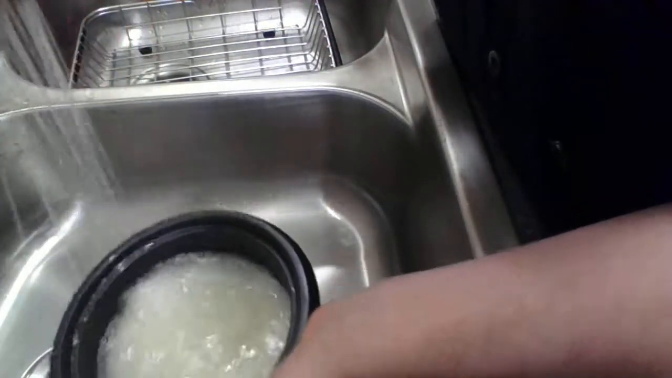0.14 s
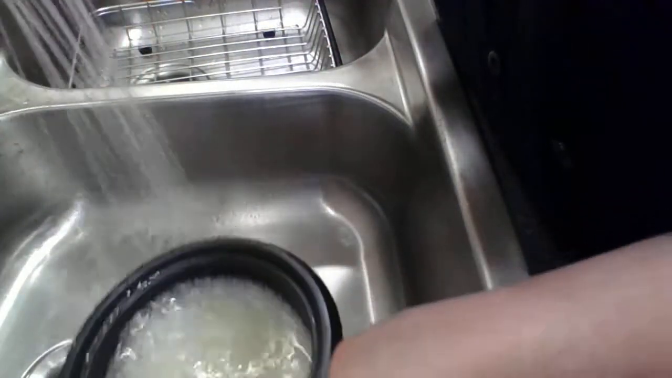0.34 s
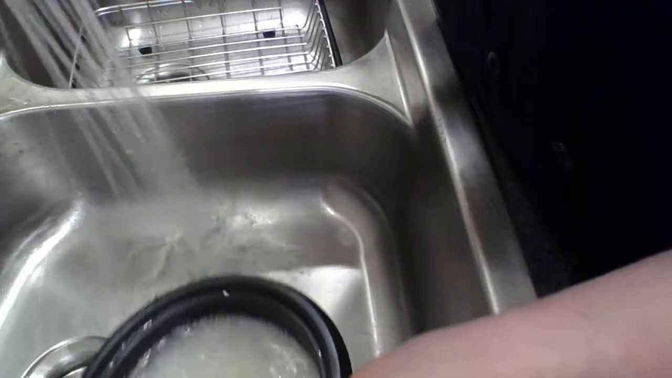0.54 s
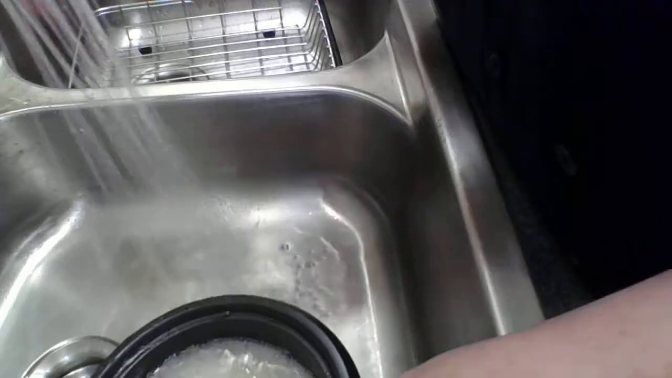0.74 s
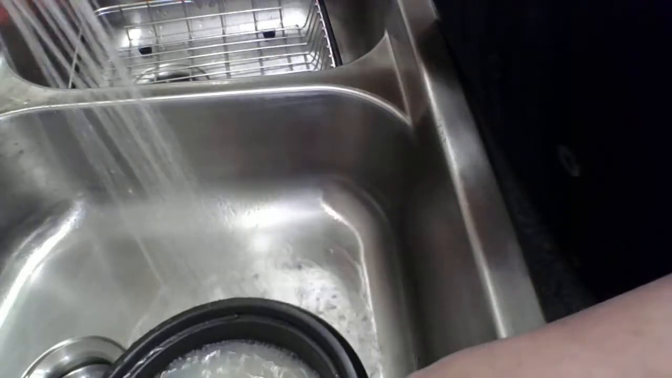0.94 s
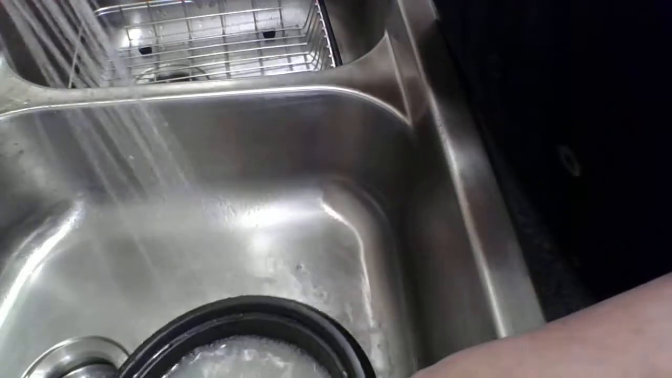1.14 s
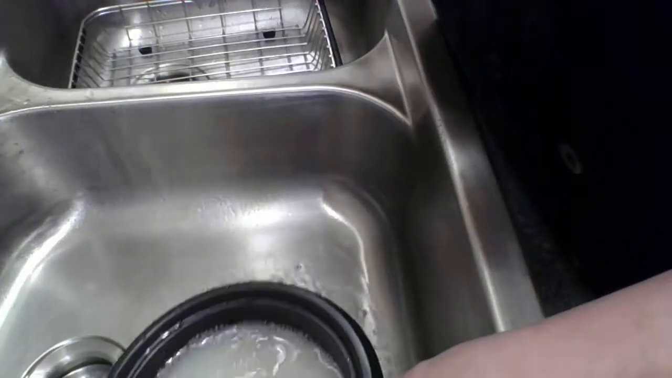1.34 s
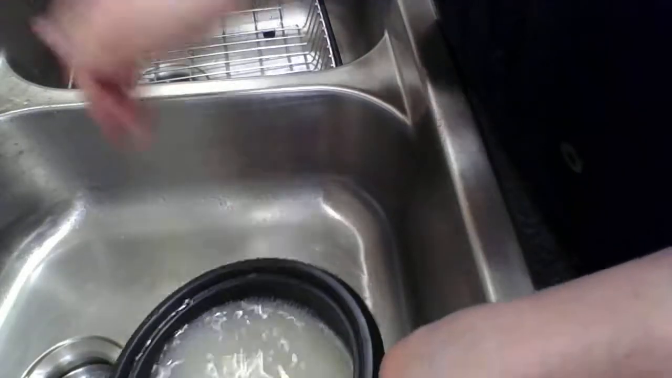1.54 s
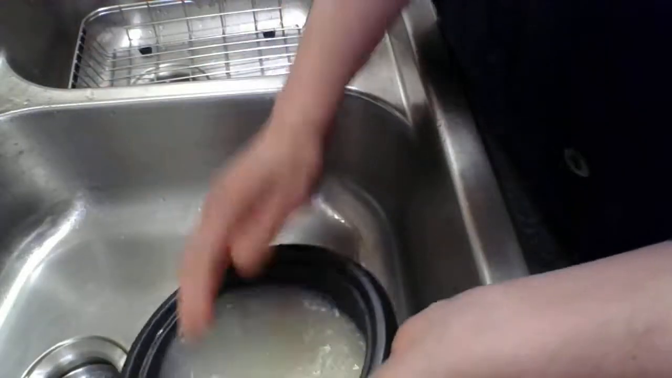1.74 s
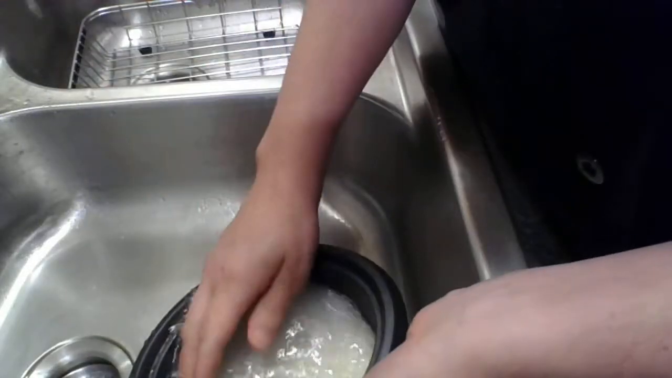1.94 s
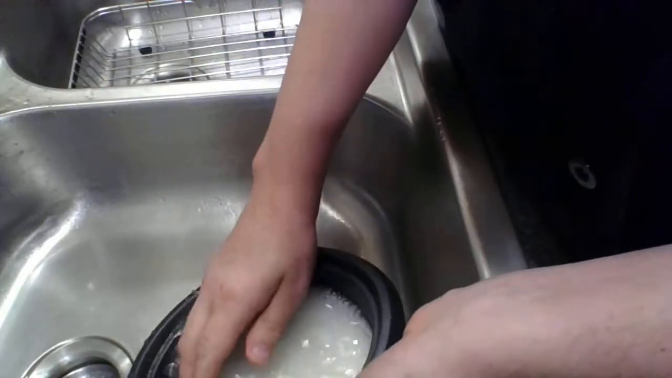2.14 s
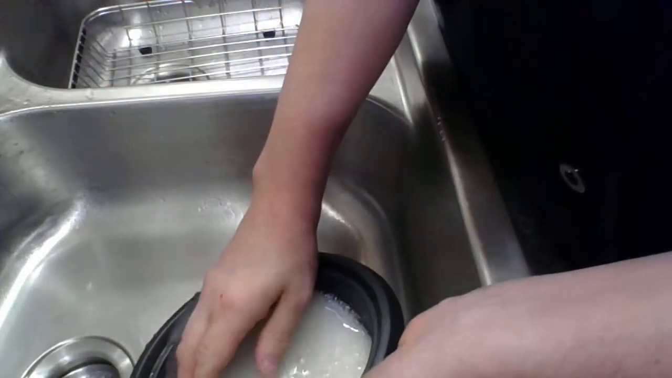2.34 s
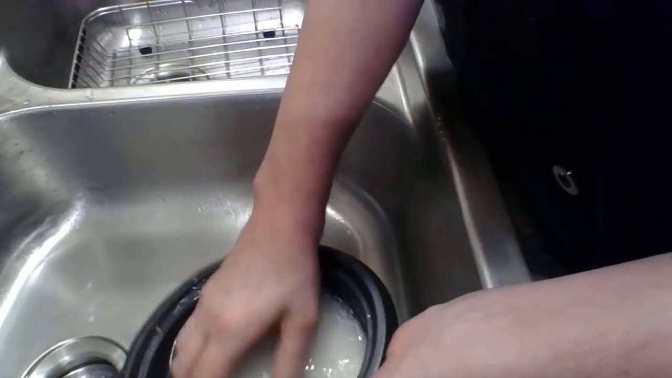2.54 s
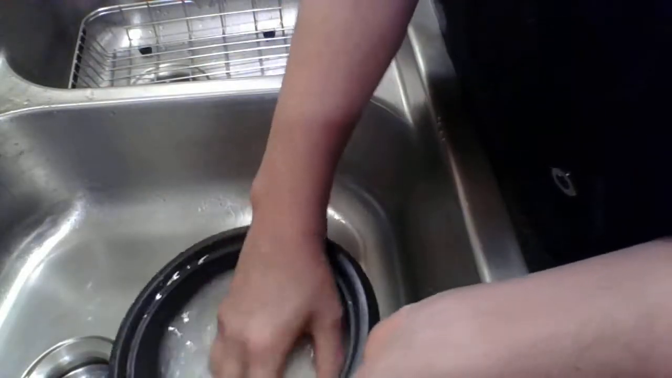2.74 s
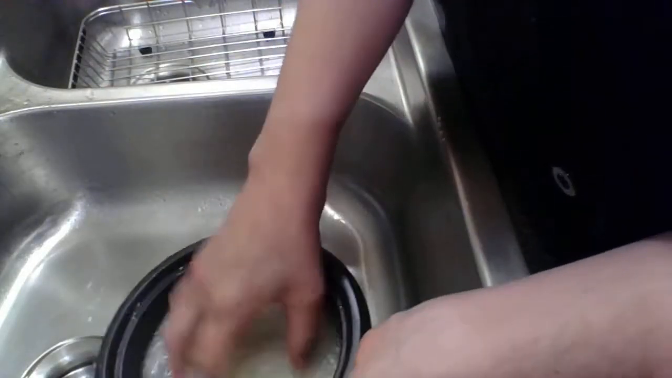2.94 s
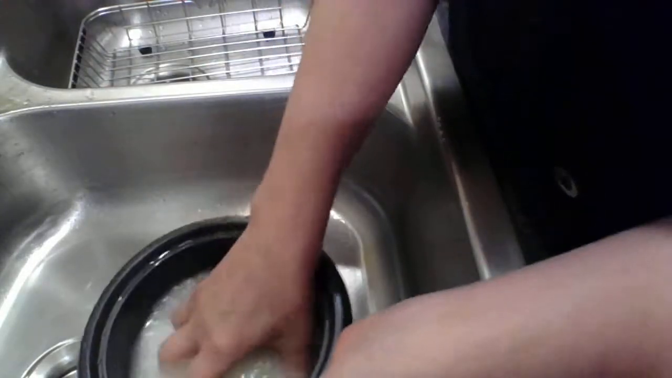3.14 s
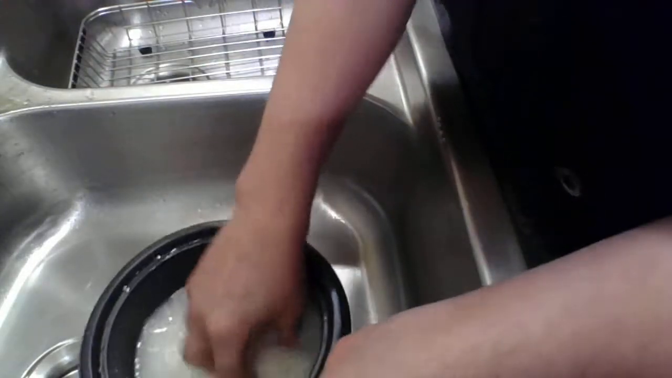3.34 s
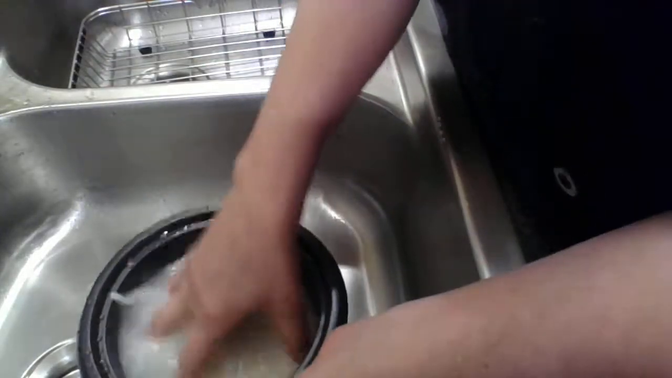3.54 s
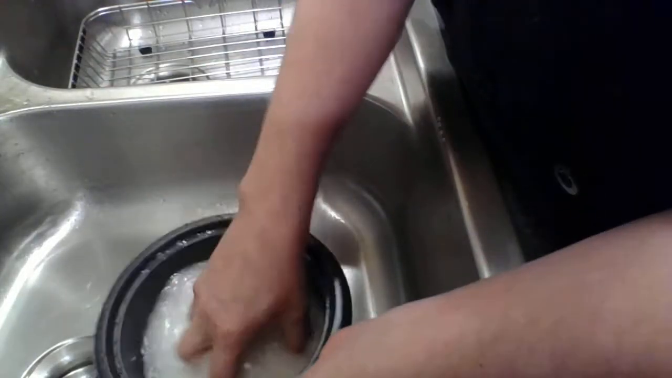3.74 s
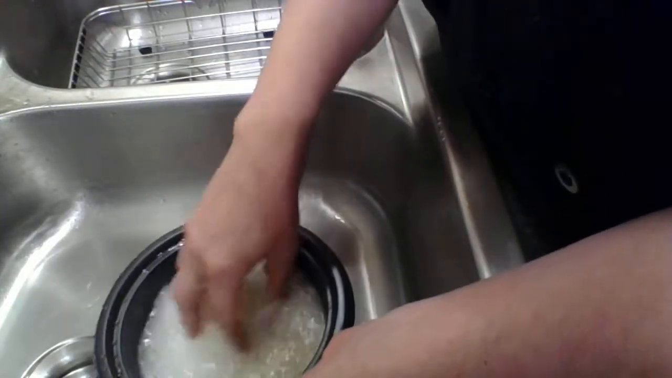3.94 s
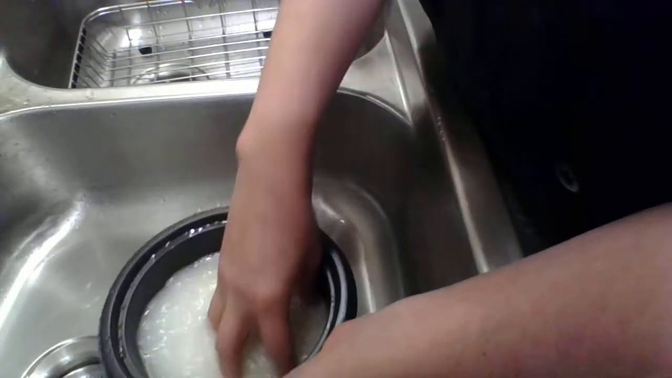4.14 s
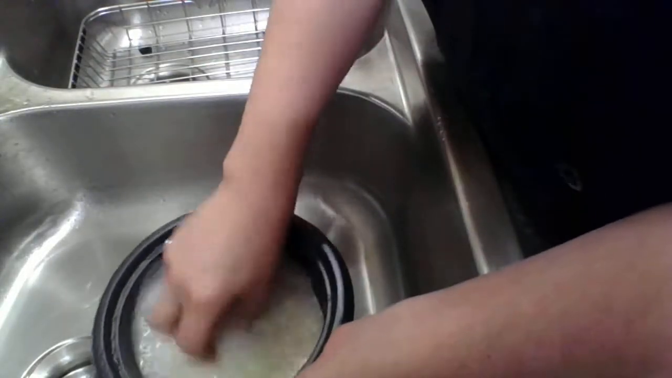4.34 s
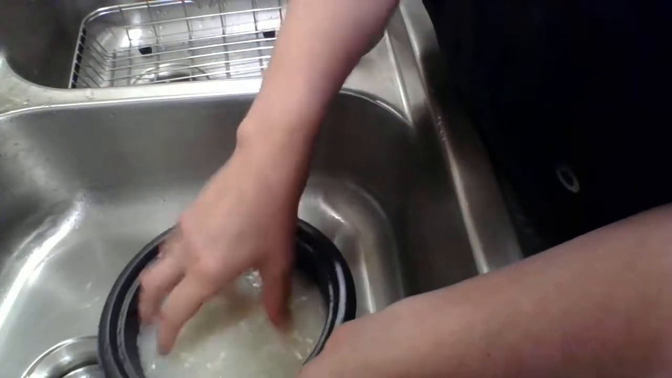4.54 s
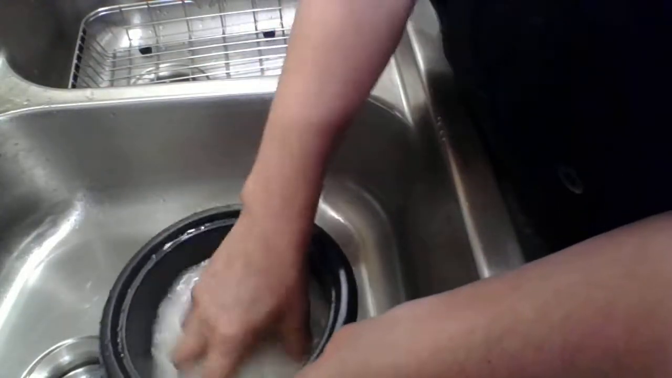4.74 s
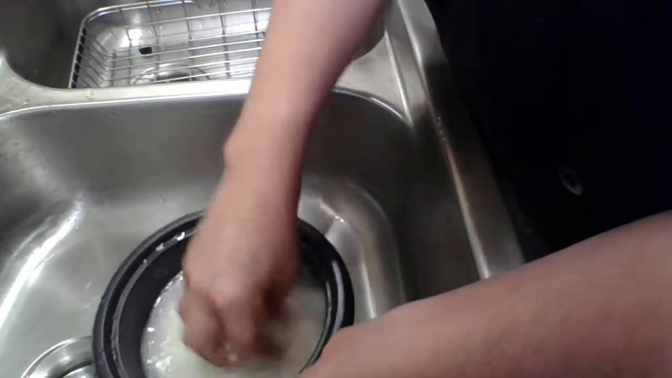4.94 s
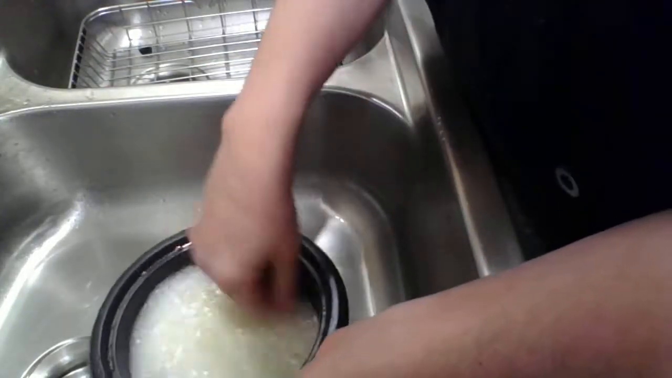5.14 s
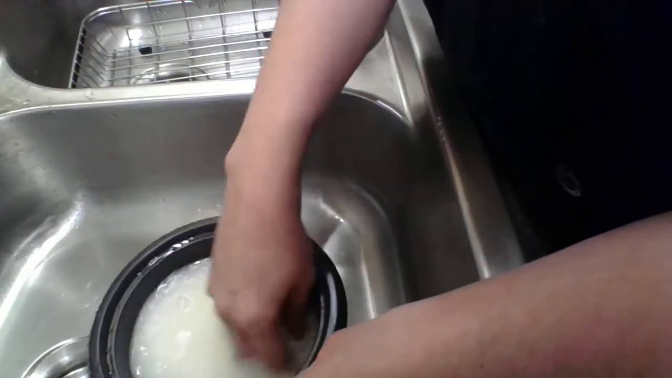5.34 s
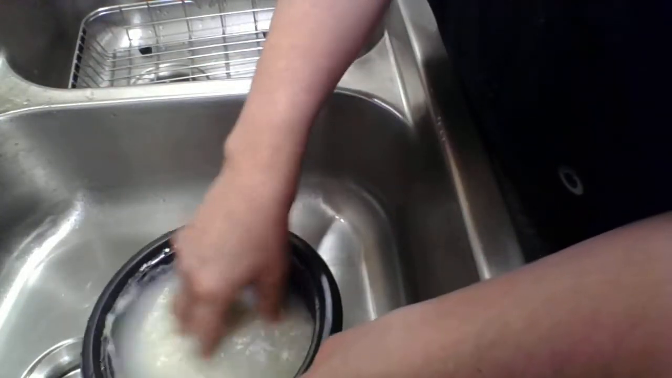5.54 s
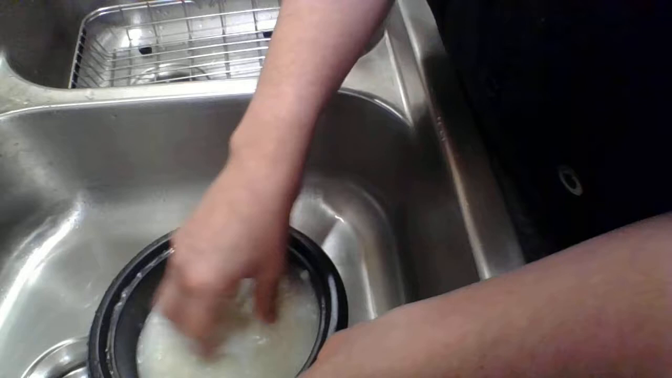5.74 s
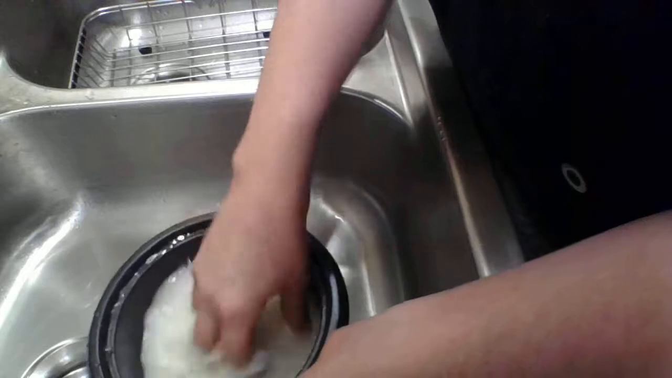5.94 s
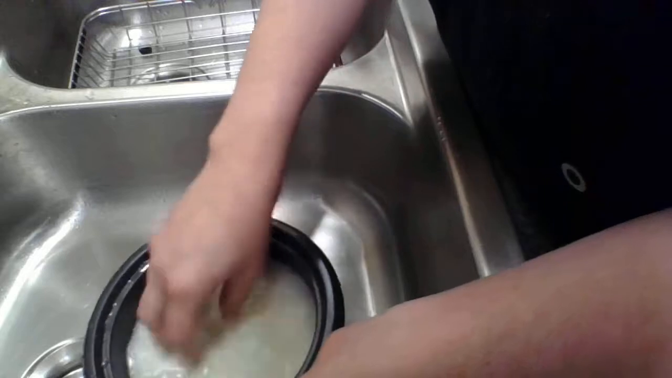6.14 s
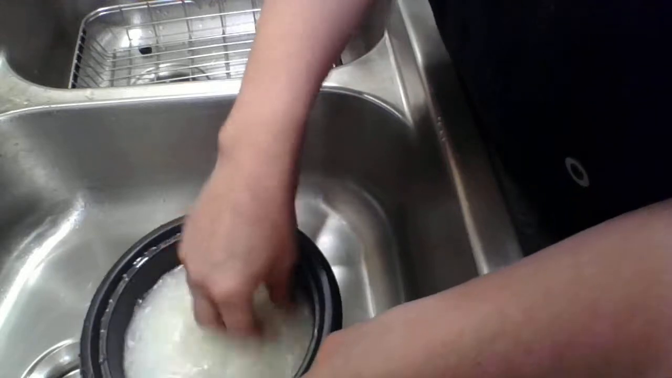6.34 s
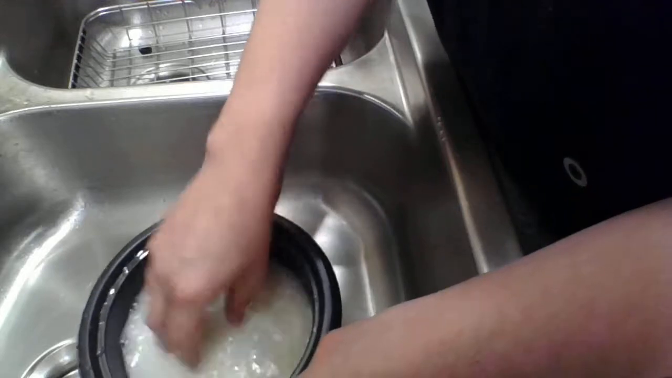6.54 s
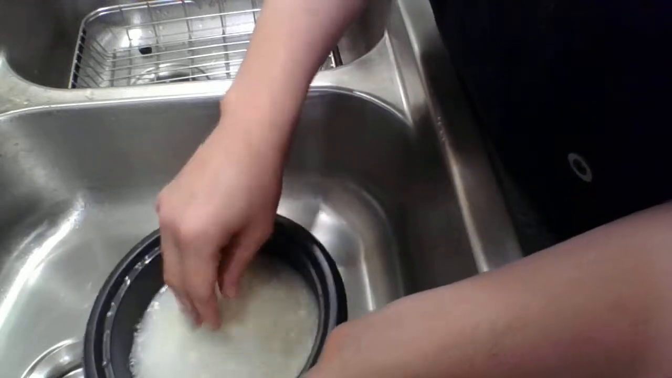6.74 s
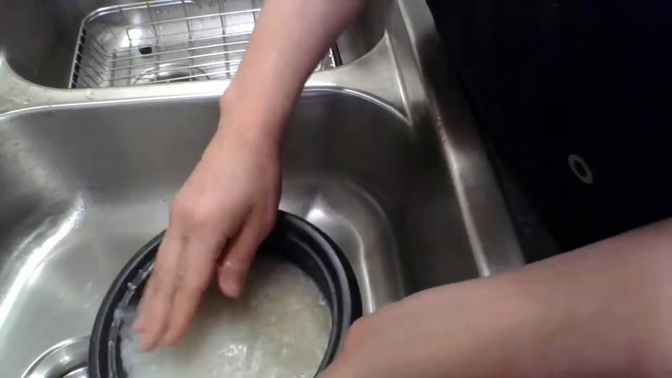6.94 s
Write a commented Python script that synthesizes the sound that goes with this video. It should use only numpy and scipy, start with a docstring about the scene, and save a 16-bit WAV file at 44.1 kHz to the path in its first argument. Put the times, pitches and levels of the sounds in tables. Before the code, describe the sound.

Water sprays into a metal kitchen sink, then shuts off, and rice is stirred by hand in a pot, sloshing, rustling and bumping.

```python
"""First a spray tap hisses and drums on a steel kitchen sink. After about 1.4 seconds it is shut off.
Then a hand stirs rice in a pot of water held in the basin: water sloshes, grains rustle, air pockets
ring and burst, and the pot bumps the sink floor. Midway the pot groans as it shifts on the wet steel.
Near the end come the loudest gurgles. The ringing basin colours the drumming, splashes and bumps."""
import sys
import numpy as np
from scipy import signal
from scipy.fft import rfft, irfft, next_fast_len
from scipy.io import wavfile
from scipy.ndimage import uniform_filter1d, map_coordinates

SR = 44100
rng = np.random.default_rng(int(sys.argv[2]) if len(sys.argv) > 2 else 0)


def log_audio(samples):
    """Write samples as a 16-bit WAV file to the path given in sys.argv[1]."""
    # one column per channel
    frames = np.atleast_2d(samples).T
    # limit to full scale, then quantise
    limited = np.clip(frames, -1, 1)
    pcm = np.round(limited * 32767).astype(np.int16)
    wavfile.write(sys.argv[1], SR, pcm)


N = 307818  # about 7 seconds


def amp(db):
    """Turn decibels (dB) into a gain to multiply by."""
    return 10 ** (np.asarray(db) / 20)


def unit(x):
    """Scale a sound to an average power of 1."""
    return x / np.sqrt(np.mean(x ** 2) + 1e-20)


def along(points, hz):
    """Read between (Hz, value) points, spaced by octaves."""
    f, v = np.transpose(points)
    return np.interp(np.log(hz + 1), np.log(f + 1), v)


def curves(rows):
    """One gain curve for each dB column; silent outside the table's times."""
    s, *cols = np.transpose(rows)
    return [amp(np.interp(np.arange(N) / SR, s, c, left=-150, right=-150)) for c in cols]


def wobble(rate):
    """A smooth curve through `rate` random values a second."""
    return map_coordinates(rng.standard_normal(int(N * rate / SR) + 4), [np.arange(N) * rate / SR])


def filtered(x, response):
    """Multiply each frequency f in a sound by response(f)."""
    size = next_fast_len(N + SR // 2)
    return irfft(rfft(x, size) * response(np.fft.rfftfreq(size, 1 / SR)), size)[..., :N]


def patchy(x, depth_db):
    """Turn narrow bands of a sound up and down briefly, at random."""
    bands = signal.stft(x, nperseg=1024)[2]
    patches = uniform_filter1d(rng.standard_normal(bands.shape), size=2, axis=0)
    patches = uniform_filter1d(patches, size=5, axis=1)
    return signal.istft(bands * amp(depth_db * unit(patches)), nperseg=1024)[1][:N]


def patter(rate, spread_db, smooth):
    """About `rate` random taps a second, over a `smooth` share of steady noise."""
    chance, size, side = rng.random((3, N))
    hits = (chance < rate / SR) * amp(-spread_db * np.log(size + 0.035)) * np.sign(side - .5)
    return unit(unit(hits) + smooth * rng.standard_normal(N))


def fizz(spectrum, count, cycles, spread_db, smooth):
    """Tiny fading pings of rising pitch over noise, coloured by the spectrum."""
    pitch, size, start = np.hsplit(rng.random((count, 3)), 3)
    hz = 900 * 13 ** pitch
    t = np.arange(int(40 * cycles + 120)) / SR
    age = hz * t / cycles
    pings = np.sin(2 * np.pi * hz * t * (1 + 0.0065 * age)) * np.exp(-age) * (1 - np.exp(-8 * age))
    pings *= np.sqrt(hz) * amp(-spread_db * np.log(size + 0.0035))
    where = (start * N).astype(int) + np.arange(len(t))
    sound = unit(np.bincount(where.ravel(), pings.ravel(), N + len(t))[:N])
    sound += smooth * rng.standard_normal(N)
    power = uniform_filter1d(np.abs(rfft(sound)) ** 2, size=4000)
    flat = irfft(rfft(sound) / np.sqrt(power + 1e-9), N)  # even it out before colouring
    return unit(filtered(flat, lambda f: amp(along(spectrum, f))))


def resonance(f, hz, width):
    """One ringing note: it answers most to frequencies near hz."""
    return 1j * f * width / (hz * hz - f * f + 1j * f * width)


# Notes of the steel basin and the air in it. Each row: pitch in Hz, width in Hz, level in dB.
BASIN_NOTES = [(103.2, 13.5, -4), (170.5, 10.4, 6.5), (241.5, 37, -2.5), (328.4, 15.5, -1), (388.3, 22, 0),
               (502, 25.2, 1), (713.5, 25, -6.5), (784, 16, -7.5), (866, 22, -5.5), (968, 54, -9.5),
               (1108, 61, -9.5), (1283, 98, -20), (1487, 70, -22.5), (1587, 97, -25.5), (1604, 79, -20),
               (1766, 62, -27), (1810, 9.2, -20.5), (2180, 28, -24), (2440, 15, -29), (2610, 9.8, -24.5)]
def vessel(f, notes=BASIN_NOTES):
    """How a hollow vessel rings: the basin, unless other notes are given."""
    return sum((-1) ** k * amp(db) * resonance(f, hz, width) for k, (hz, width, db) in enumerate(notes))


# Tone of the background. Each row: frequency in Hz, level in dB.
AIR_TONE = [(24, -31), (58, -13.5), (95, 4.5), (186, 1.5), (310, -8), (441, -2.5), (631, -6), (863, -3),
            (972, -14), (1100, 2.5), (1360, -13.5), (2150, -17.5), (3080, -11), (4630, -8), (8030, -18.5),
            (10700, -8), (12400, -37.5), (16100, -65), (22000, -120)]
def air():
    """The steady murmur of the room and the microphone."""
    return amp(-78.5) * unit(filtered(rng.standard_normal(N), lambda f: amp(along(AIR_TONE, f))))


# The room's echo. Each row: frequency in Hz, seconds to fade by 60 dB.
ECHO_TIMES = [(200, 0.37), (1000, 0.18), (3000, 0.35), (10000, 0.033)]
def kitchen_echo(x):
    """The room answers; each frequency dies away at its own speed."""
    hz, t, bands = signal.stft(rng.standard_normal(SR // 2), SR, nperseg=256)
    tail = signal.istft(bands * amp(-60 * t / along(ECHO_TIMES, hz)[:, None]), SR, nperseg=256)[1]
    return signal.fftconvolve(np.pad(x, (300, 0)), tail / np.linalg.norm(tail))[:N]


# One list for each groan of the pot. Each row: time in seconds, pitch in Hz, level in dB.
GROANS = [
    [(2.74, 239, -82), (2.77, 265, -64), (2.795, 318, -69), (2.82, 364, -74), (2.86, 380, -86)],
    [(3.7, 876, -78), (3.718, 820, -64), (3.76, 826, -61.5), (3.8, 798, -68), (3.83, 754, -76)],
    [(3.55, 342, -78), (3.57, 341, -59), (3.63, 352, -69), (3.69, 361, -66.5), (3.8, 358, -67),
     (3.9, 344, -76.5), (4.2, 327, -79), (4.3, 342, -80)],
]
def groans():
    """The pot sticks and slips on the wet steel, making a rough, unsteady tone."""
    out, t = np.zeros(N), np.arange(N) / SR
    for rows in GROANS:
        s, hz, db = np.transpose(rows)
        phase = 2 * np.pi * np.cumsum(np.interp(t, s, hz)) / SR
        level = amp(np.interp(t, s, db, left=-150, right=-150) + 0.88 * wobble(25))
        out += level * ((0.07 + wobble(120)) * np.sin(phase) + wobble(120) * np.cos(phase))
    return out


# Finger strokes. Each row: time of the peak in seconds, peak level in dB, length in seconds.
STROKES = [(2.787, -70, 0.16), (3.137, -69, 0.29), (3.412, -72, 0.65), (3.647, -70, 0.081),
           (3.753, -59, 0.03), (3.827, -69, 0.18), (4.254, -67, 0.47), (4.555, -61.5, 0.057),
           (4.653, -59, 0.062), (4.806, -66, 0.22), (5.163, -67.5, 0.15), (5.298, -60, 0.078),
           (5.457, -58.5, 0.097), (5.6, -69.5, 0.41), (5.756, -65, 0.12), (5.882, -59, 0.04),
           (6.003, -64, 0.18), (6.126, -64, 0.039), (6.31, -64, 0.078), (6.4, -66.5, 0.18),
           (6.657, -61, 0.13), (6.897, -67.5, 0.027)]
# Tone of the rice. Each row: frequency in Hz, level in dB.
RICE_TONE = [(880, -36), (1500, -8.5), (1940, -1.5), (2550, 0), (3010, -10), (4440, -6.5), (5210, -13),
             (7890, -22.5), (8920, -20.5), (10700, -15.5), (11300, -20), (12400, -74.5), (16100, -78),
             (22000, -120)]
def rice(lumps):
    """Grains rub and tick against each other; each stroke swells, then fades more slowly."""
    swell_db, fade_db = 26, 12  # drop from the peak, one length before and after it
    rub = amp(0.97 * lumps + 1.7 * wobble(60))
    rub *= fizz(RICE_TONE, count=8000, cycles=3.2, spread_db=2.5, smooth=1.6)
    ticks = patter(700, spread_db=3.5, smooth=0.1)
    ticks = filtered(ticks, lambda f: amp(along(RICE_TONE, f)) * f / 4000)
    t = np.arange(N) / SR
    power = amp(-86.5) ** 2 * (t > STIR_LEVELS[0][0])  # a faint rustle once stirring starts
    for s, db, length in STROKES:
        power += amp(db - np.where(t < s, swell_db, fade_db) * np.abs(t - s) / length) ** 2
    return np.sqrt(power) * (unit(rub) + amp(-9.5) * unit(ticks))


# The stirring hand. Each row: time in seconds, slosh level in dB, rumble level in dB.
STIR_LEVELS = [(1.4, -55, -77), (1.5, -65.5, -94), (1.6, -64, -74), (1.68, -63, -66.5), (1.77, -72, -73.5),
               (2.05, -69.5, -75), (2.24, -63.5, -73.5), (2.52, -63.5, -67), (2.7, -55, -66),
               (2.84, -65, -74), (2.95, -64, -79), (3.02, -64, -77), (3.07, -62, -87), (3.13, -63, -77),
               (3.22, -61, -73), (3.3, -58, -64.5), (3.37, -57.5, -61.5), (3.47, -66.5, -79),
               (3.73, -61.5, -87), (3.95, -69, -80.5), (4.08, -76.5, -83), (4.3, -65.5, -85),
               (4.5, -74, -89), (4.67, -66, -84), (5.0, -83.5, -83.5), (5.17, -66.5, -79),
               (5.38, -73.5, -85.5), (5.55, -67.5, -74), (5.84, -67.5, -85), (5.95, -72.5, -73),
               (6.05, -51.5, -76), (6.27, -70, -80.5), (6.44, -55.5, -66), (6.59, -71, -75.5),
               (6.98, -75, -77.5)]
# Tones of the slosh and of its small bubbles. Each row: frequency in Hz, level in dB.
SLOSH_TONE = [(500, -25), (750, -8.5), (1200, -5), (2000, 6.5), (3000, 7.5), (4000, -16.5)]
PLIP_TONE = [(700, -37), (1000, 7.5), (1900, 5), (2600, -11), (3300, -21), (4500, -7), (6500, -40.5)]
def stirring():
    """Water sloshes in lumps, sheds small bubbles, moves the rice and rumbles through the pot."""
    slosh_gain, rumble_gain = curves(STIR_LEVELS)
    lumps = wobble(16)  # water and rice surge together
    water = patter(1500, spread_db=-6.5, smooth=0.95) * amp(0.85 * lumps + 3.66 * wobble(45))
    water = filtered(water, lambda f: (vessel(f) + amp(-41)) * amp(along(SLOSH_TONE, f)))
    plips = fizz(PLIP_TONE, count=3500, cycles=10, spread_db=4, smooth=0.1)
    rustle = rice(lumps)
    knocks = patter(67, spread_db=4.5, smooth=0.52)
    rumble = filtered(knocks, lambda f: vessel(f) / (1 + 1j * f / 330) ** 2)
    return slosh_gain * (amp(-4) * unit(water) + amp(-12.5) * plips) + rustle + rumble_gain * unit(rumble)


# Drops from the jets, then the fingers. Each row: start in seconds, level in dB, boosted pitch in Hz.
SPATTERS = [(.378, -50, 10000), (.449, -55, 10000), (.497, -53.5, 4000), (.555, -49.5, 5500),
            (.688, -49, 10500), (.698, -52, 5540), (.836, -44, 9600), (0.842, -44.5, 4770),
            (.925, -47.5, 9600), (.984, -65, 5000), (1.34, -67, 6500), (1.6378, -62, 3930),
            (3.029, -63, 4330), (3.5255, -58, 3820), (3.7493, -55, 4800), (3.7488, -55, 6700),
            (3.757, -54, 2970), (4.399, -56, 3480), (4.543, -57, 4000), (4.549, -64, 4500),
            (4.586, -50.5, 4100), (4.66, -60, 3900), (4.857, -50.5, 8900), (5.1337, -57, 5100),
            (5.429, -55.5, 4640), (5.821, -60, 4300), (5.872, -66, 4440), (5.9997, -56, 4680),
            (6.143, -53.5, 10400), (6.3201, -41.5, 3570), (6.324, -45.5, 4200), (6.6145, -59, 3740)]
def spatters():
    """Fine drops land in short, bright bursts of noise."""
    attack_s, fade_s, spike_s = 0.0008, 0.022, 0.0096
    out, t = np.zeros(N + SR), np.arange(SR // 8) / SR
    f = np.fft.rfftfreq(len(t), 1 / SR)
    shape = (1 - np.exp(-t / attack_s)) * amp(-60 * t / fade_s) * (1 + amp(-60 * t / spike_s))
    for s, db, hz in SPATTERS:
        colour = amp(along(RICE_TONE, f)) * (.5 + 13.2 / (1 + ((f - hz) / 600) ** 2))
        drops = rng.standard_normal(len(t)) * (0.38 + 4 * (rng.random(len(t)) < 0.012))
        burst = unit(irfft(rfft(drops) * colour, len(t)))
        out[round(s * SR):][:len(t)] += amp(db) * shape * burst
    return out[:N]


# Notes of the full pot. Each row: pitch in Hz, width in Hz, level in dB.
POT_NOTES = [(199, 25, 5.7), (442, 28, 6.3)]
# The pot meets the sink floor. Each row: start in seconds, strength of the push in dB.
BUMPS = [(1.719, -1), (1.901, -13), (2.001, -9), (2.212, 17.5), (2.62, 2), (2.992, -2), (3.255, 14),
         (3.268, 11.5), (3.437, -2), (3.558, -1.5), (4.355, -5.5), (4.467, -7), (4.516, -6), (4.87, -6.5),
         (5.782, -3), (5.951, -3), (6.0, -4.5), (6.232, -3), (6.325, -2), (6.409, 2), (6.44, 18),
         (6.656, -4.5)]
def bumps():
    """A soft push, then a judder as the pot settles. Heavy bumps ring the basin, light ones the pot."""
    soft_hz, judder_s, heavy_db = 100, 0.12, 5
    heavy, light = np.zeros((2, N + SR))
    t = np.arange(SR // 4) / SR
    push = t * np.exp(-2 * np.pi * soft_hz * t)
    for s, db in BUMPS:
        judder = amp(-33 - 60 * t / judder_s) * rng.standard_normal(len(t))
        judder[0] = 1  # the first contact
        track = light if db < heavy_db else heavy
        track[round(s * SR):][:len(t)] += amp(db) * signal.fftconvolve(judder, push / push.sum())[:len(t)]
    thuds = filtered(heavy[:N], vessel) + filtered(light[:N], lambda f: vessel(f, POT_NOTES))
    return amp(6) * filtered(thuds, lambda f: 1 / (1 + 130 / (1j * f + 1)) ** 4)  # thin the bass


# Air pockets in the water. Each row: start in seconds, strength in dB, pitch in Hz,
# seconds to fade by 60 dB, share by which the pitch rises in a third of that time.
BUBBLES = [(.007,-50,1660,0.22,0.06), (0.098,-34,2270,0.03,0.17), (.105,-21.5,960,0.015,0.01),
           (1.403,-26,1128,0.022,0), (1.438,-39,1080,0.021,0.1), (1.454,-34,1064,0.03,0.07),
           (1.468,-28,1120,0.025,0), (1.498,-37,1120,0.017,0.14), (1.879,-36,1095,0.035,0.02),
           (1.918,-45,956,0.03,0.03), (1.939,-45,1100,0.03,0.03), (1.975,-38,1080,0.035,0.03),
           (1.976,-42,900,0.03,0), (2.142,-57.5,1123,0.085,0.03), (2.209,-29,1105,0.053,0.06),
           (2.259,-37.5,1080,0.024,0.09), (2.328,-38.5,1100,0.038,0.04), (2.391,-40,1098,0.036,0),
           (2.435,-32,930,0.015,0), (2.438,-46,1600,0.02,0.1), (2.484,-44,1014,0.01,0.4),
           (2.486,-50,1520,0.014,0), (2.552,-36,1100,0.029,0), (2.59,-47,974,0.094,0.3),
           (2.621,-25,916,0.038,0), (2.66,-32,960,0.023,0), (2.686,-34,928,0.023,0.04),
           (2.709,-39,960,0.025,.01), (2.733,-43.5,966,0.07,0.01), (2.981,-30.5,934,0.016,0),
           (3.01,-44,1670,0.025,0.06), (3.15,-48,1910,0.034,0), (3.186,-41.5,1890,0.025,0.05),
           (3.35,-32.5,865,0.024,0.15), (3.352,-37,1834,0.024,0), (3.753,-29.5,2520,0.0096,0),
           (4.254,-52.5,950,0.027,0.15), (4.399,-33.5,1030,0.017,0.35), (4.402,-34,1520,0.028,0.31),
           (4.543,-47,2237,0.047,0.3), (4.561,-32,1763,0.028,0), (4.584,-46,1920,0.042,0.02),
           (5.162,-51.5,2100,0.046,0.05), (5.448,-24,2110,0.016,0.03), (5.463,-10,898,0.021,0.03),
           (5.4755,-18,950,0.012,0), (5.484,-37,1450,0.02,0.43), (5.494,-27,890,0.013,0.3),
           (5.496,-24,2120,0.012,0.1), (5.508,-36.5,2225,0.013,0.13), (5.52,-51,920,0.025,0.3),
           (5.799,-43.5,2710,0.031,0), (5.83,-40.5,1634,0.036,0.17), (5.841,-42,1840,0.023,0.4),
           (5.84,-41,1236,0.053,0), (5.863,-30.5,1710,0.027,0.1), (5.992,-26,846,0.018,0.14),
           (6.004,-24,770,0.02,0), (6.012,-28,760,0.026,0), (6.02,-34,770,0.013,0.6),
           (6.027,-14,804,0.011,0.2), (6.058,-20,746,0.024,0), (6.063,-23,784,0.036,0.02),
           (6.07,-15.5,850,0.021,0), (6.077,-21,899,0.033,0.21), (6.079,-35,1597,0.019,0.35),
           (6.087,-19,1021,0.016,0), (6.102,-40,890,0.011,0.1), (6.117,-18.5,1084,0.019,0.01),
           (6.125,-33,1100,0.015,0.18), (6.322,-18.5,874,0.014,0.17), (6.326,-23,1160,0.019,0.08),
           (6.332,-25,1490,0.025,0), (6.356,-34.5,735,0.1,0), (6.374,-34,855,0.086,0.23),
           (6.389,-31,745,0.053,0), (6.392,-43.5,1247,0.079,0.1), (6.404,-35.5,746,0.075,0.23),
           (6.422,-35,877,0.038,0.23), (6.427,-44,1790,0.034,0.01), (6.435,-35,1037,0.022,0.16),
           (6.434,-37.5,2300,0.022,0.04), (6.439,-46,2600,0.022,0.03), (6.645,-48.5,1235,0.059,0.04),
           (6.659,-33.5,930,0.018,0.02), (6.704,-42.5,1240,0.039,0), (6.841,-51,1927,0.041,0)]
def bubbles():
    """Air pockets ring unevenly as the water reshapes them; most rise in pitch."""
    attack_s, strong_db = .0032, -14.9
    rings, t = np.zeros(N + SR), np.arange(SR // 5) / SR
    shaking = amp(1.8 * wobble(110))
    drift = np.pad(.55 * wobble(140), (0, SR))
    for s, db, hz, fade_s, rise in BUBBLES:
        start = round(s * SR)
        pitch = hz * (1 + rise * (np.minimum(3 * t / fade_s, 1.5) - .3))
        phase = 2 * np.pi * np.cumsum(pitch) / SR
        phase += (drift[start:][:len(t)] - drift[start]) * np.minimum(fade_s / .04, 1)
        closing = 2.4 if db > strong_db else 1.45  # strong pockets hold, then snap shut
        level = amp(db - 60 * (t / fade_s) ** closing) * (1 - np.exp(-t / attack_s)) ** 2
        rings[start:][:len(t)] += level * np.sin(phase)
    return filtered(rings[:N] * shaking,
                    lambda f: (1 + amp(-6) * vessel(f)) / (1 + 450 / (1j * f + 1)) ** 2)


# Slaps of water. Each row: start in seconds, strength in dB.
SPLASHES = [(.007, -4), (0.104, -2), (1.22, -7), (1.88, -13), (1.976, -16.5), (2.207, -7), (2.259, -13),
            (2.434, -16.5), (2.481, -17.5), (2.548, -19), (2.589, -20), (2.621, -6.5), (2.66, -11),
            (2.708, -15), (2.734, -19), (2.867, -19), (2.93, -27), (2.98, -19.5), (3.007, -25),
            (3.188, -34), (3.213, -13), (3.347, -16), (3.753, -31), (4.399, -17.5), (4.663, -27),
            (5.448, -10), (5.487, -6.5), (5.83, -13), (5.991, -10.5), (6.08, -4.5), (6.116, -25),
            (6.32, -7.5), (6.386, -24), (6.434, -15.5), (6.66, -19), (6.705, -16.5)]
# Tone of a slap. Each row: frequency in Hz, level in dB.
SPLASH_TONE = [(450, -34.5), (750, -16.5), (1200, -4), (1800, 0), (2600, -16), (5000, -25.5), (12000, -58)]
def splashes():
    """Water slaps the pot and basin, and each bursting air pocket adds a small splash."""
    attack_s, fade_s = .001, 0.045
    slaps, t = np.zeros(N + SR), np.arange(SR // 5) / SR
    shape = (1 - np.exp(-t / attack_s)) * amp(-60 * t / fade_s)
    bursts = [(s, db - 16) for s, db, *_ in BUBBLES]
    for s, db in SPLASHES + bursts:
        slaps[round(s * SR):][:len(t)] += amp(db) * shape * rng.standard_normal(len(t))
    return filtered(slaps[:N], lambda f: (vessel(f) + amp(-26)) * amp(along(SPLASH_TONE, f)))


# The running tap. Each row: time in seconds, drumming level in dB, hiss level in dB.
SPRAY_LEVELS = [(0.0, -48, -62.5), (0.048, -53, -62), (0.12, -41, -58), (0.18, -42, -64.5),
                (0.252, -38, -57), (0.37, -41, -55.5), (0.44, -38.5, -54), (0.522, -40.5, -56.5),
                (0.6, -38.5, -56.5), (0.662, -36, -54.5), (0.8, -43.5, -59), (0.86, -41, -58),
                (0.93, -42, -58.5), (1.0, -39.5, -55), (1.06, -42.5, -59.5), (1.182, -40, -56),
                (1.33, -43.5, -61.5), (1.362, -45.5, -63.5), (1.385, -45, -74), (1.474, -55.5, -92),
                (1.62, -65.5, -91)]
# Tone of the jets. Each row: frequency in Hz, level in dB.
JET_TONE = [(760, -42), (1300, -13), (1790, -3), (1990, -8), (2440, -6), (3180, -11.5), (4680, -5.5),
            (7940, -12.5), (9680, -5), (10700, -1.5), (11500, -8), (12400, -65), (16100, -65),
            (22000, -120)]
# High ring of the steel under the jets. Each row: pitch in Hz, width in Hz, share added.
HIGH_NOTES = [(2460, 35, 1), (4550, 50, 1), (4900, 66, 0.19), (5460, 44, 0.19)]
def spray():
    """Drops drum on the basin; the jets hiss, spit and make the steel ring faintly."""
    drum_gain, hiss_gain = curves(SPRAY_LEVELS)
    drops = amp(0.5 * wobble(30)) * patter(2500, spread_db=2, smooth=1.2)
    drops = patchy(drops, depth_db=2.6)  # the jets wander, feeding now one note, now another
    drumming = unit(filtered(drops, vessel))
    flutter = amp(1.5 * wobble(12) + 1.3 * wobble(30) + 1.3 * wobble(90))
    jets = flutter * fizz(JET_TONE, count=9000, cycles=5, spread_db=0.5, smooth=1.5)
    jets = filtered(jets, lambda f: 1 + sum(share * resonance(f, hz, w) for hz, w, share in HIGH_NOTES))
    spit = filtered(patter(160, spread_db=4, smooth=0.05), lambda f: amp(along(JET_TONE, f)))
    return drum_gain * drumming + hiss_gain * unit(unit(jets) + amp(-12) * unit(spit))


def scene():
    """Everything close to one microphone; only the sudden sounds get an echo."""
    hits = bubbles() + splashes() + bumps() + spatters()
    return (hits + amp(-9.5) * kitchen_echo(hits) + spray() + stirring() + groans() + air())[None]


def record(dry):
    """The microphone loses the deep bass and the very highest treble."""
    bass_hz, top_hz = 70, 12400
    return filtered(dry, lambda f: (f < top_hz) * (1j * f / (bass_hz + 1j * f)) ** 2)


dry = scene()
out = record(dry)
log_audio(out)
```